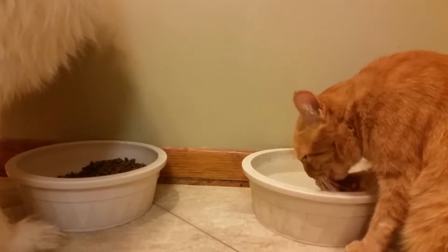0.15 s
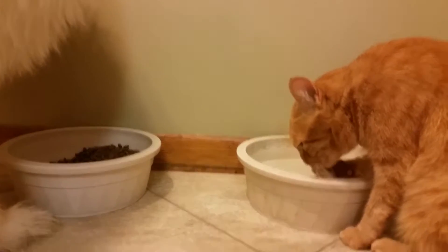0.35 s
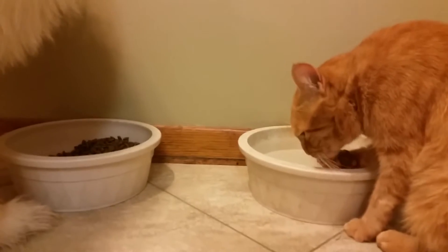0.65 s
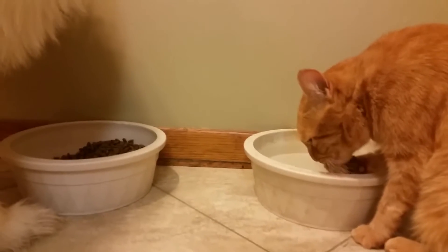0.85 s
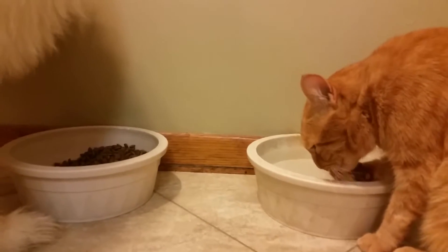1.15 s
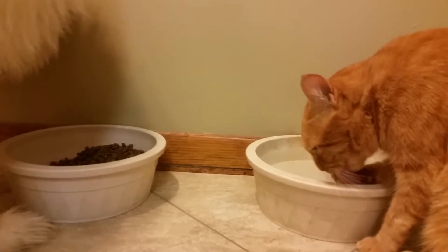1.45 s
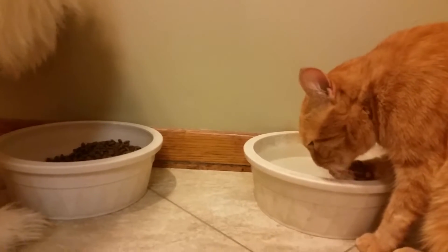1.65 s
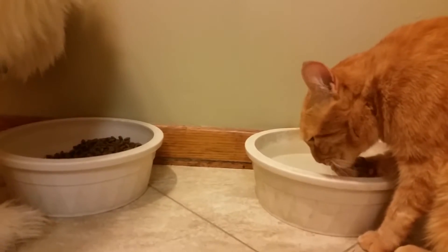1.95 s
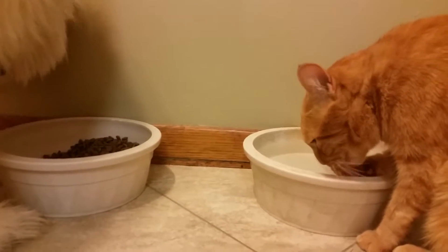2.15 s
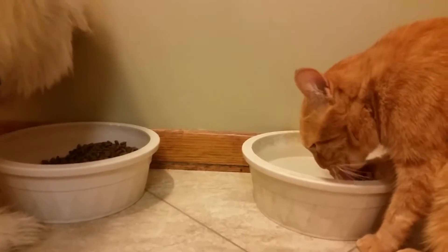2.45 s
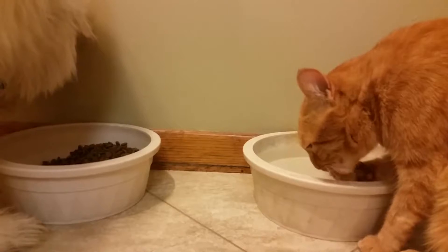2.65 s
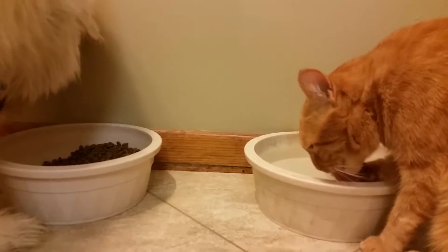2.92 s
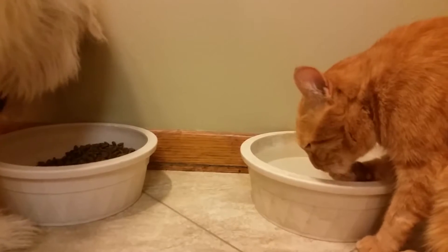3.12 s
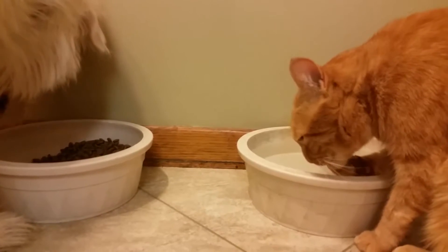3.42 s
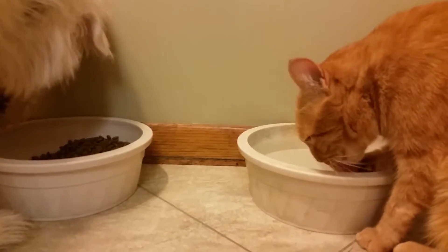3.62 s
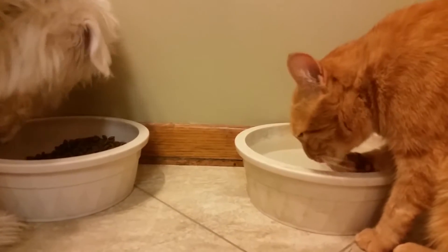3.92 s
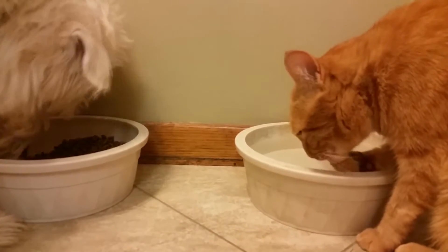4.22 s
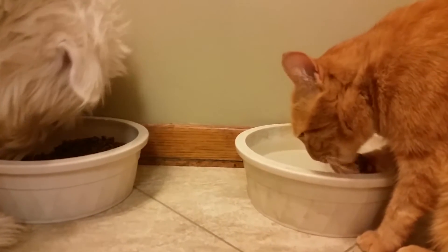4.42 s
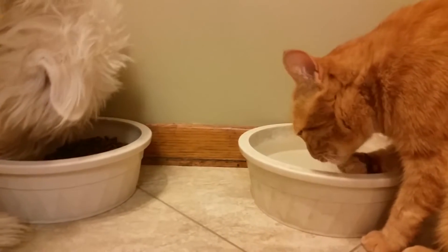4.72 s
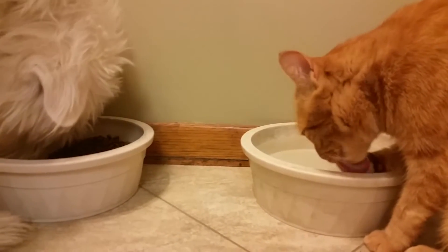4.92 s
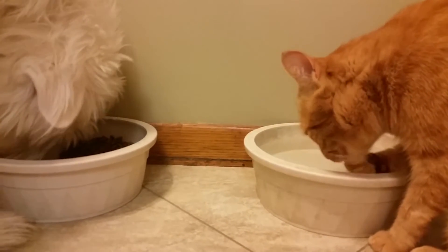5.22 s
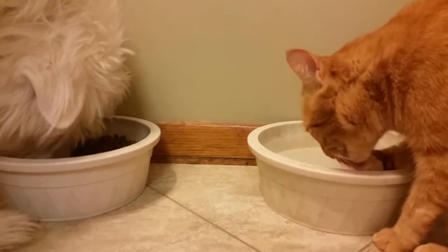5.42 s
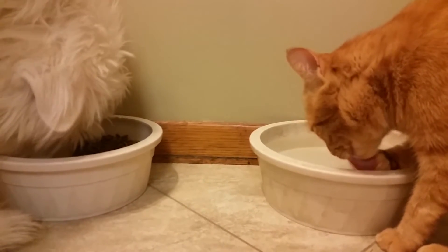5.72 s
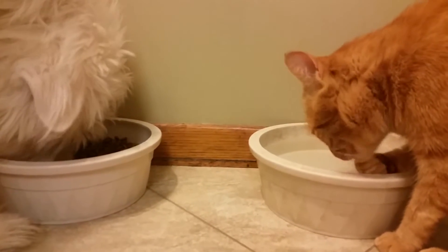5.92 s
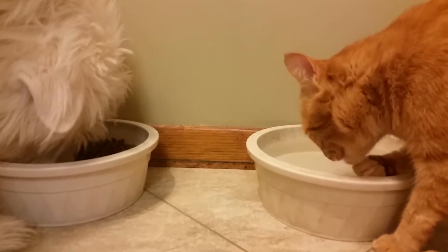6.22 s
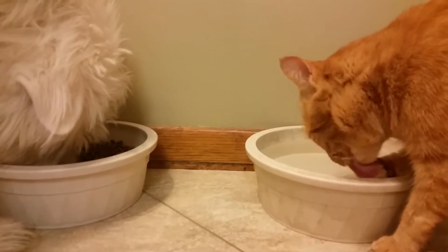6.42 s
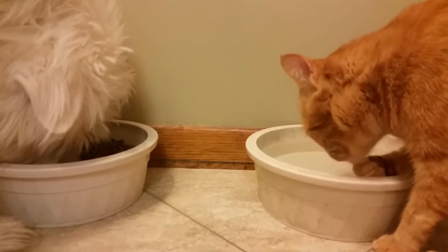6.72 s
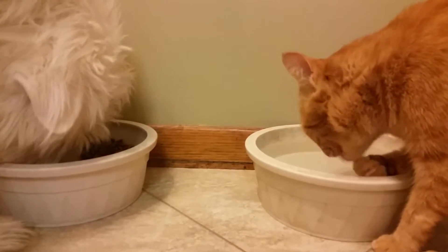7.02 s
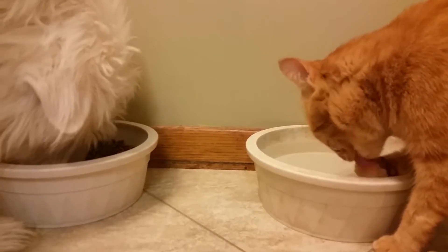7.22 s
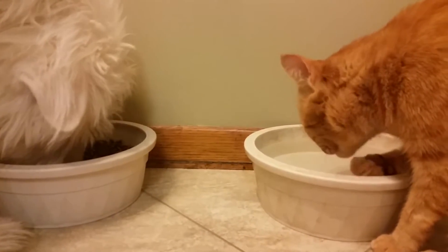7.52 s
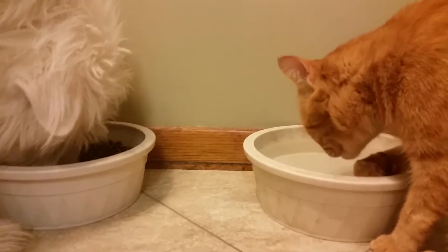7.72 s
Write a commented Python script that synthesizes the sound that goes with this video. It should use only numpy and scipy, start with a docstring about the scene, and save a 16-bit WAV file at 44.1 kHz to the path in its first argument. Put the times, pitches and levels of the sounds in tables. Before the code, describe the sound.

A low household hum and fan rush fill a small room; a few faint licks sound, then a dog starts cracking dry food.

```python
"""A dog cracks dry kibble over its bowl in a small tiled room: each pellet snaps, rings and sheds crumbs.
A cat laps water almost silently; tongues and lips make a few soft, wet smacks.
Underneath, household motors, probably a refrigerator, hum at nearly equal pitches and throb against
each other over a fan's rush. Fingers tick, rub and bump faintly on the hand-held camera, to the left."""
import sys
import numpy as np
from scipy import signal
from scipy.fft import rfft, irfft, next_fast_len
from scipy.io import wavfile
from scipy.ndimage import map_coordinates

SR = 44100
rng = np.random.default_rng(int(sys.argv[2]) if len(sys.argv) > 2 else 0)


def dump(signal):
    """Clip the signal to [-1, 1] and save it as 16-bit WAV at the path in sys.argv[1]."""
    limited = np.clip(np.atleast_2d(signal).T, -1, 1)
    pcm = np.round(limited * 32767).astype(np.int16)
    wavfile.write(sys.argv[1], SR, pcm)


N = 346625


def amp(db):
    """Decibels to gain."""
    return 10 ** (np.asarray(db) / 20)


def unit(x):
    """Scale to rms 1."""
    return x / np.sqrt(np.mean(x ** 2) + 1e-20)


def curve_at(points, hz):
    """Read a breakpoint curve on a log frequency axis."""
    freqs, values = np.transpose(points)
    return np.interp(np.log(hz + 1), np.log(freqs + 1), values)


def panned(db):
    """Stereo gains that put the left channel db above the right."""
    return amp(np.array([[db], [-db]]) / 2)


def wobble(rate):
    """Smooth random modulation, rate knots a second."""
    knots = rng.standard_normal(int(N * rate / SR) + 4)
    return map_coordinates(knots, [np.arange(N) * rate / SR])


def scattered(count):
    """Rising random places between 0 and 1, one in each equal part."""
    return (np.arange(count) + rng.random(count)) / count


def eq(x, gain):
    """Zero-phase EQ; gain is a function of frequency."""
    n = x.shape[-1]
    padded = next_fast_len(n + 8192)
    return irfft(rfft(x, padded) * gain(np.fft.rfftfreq(padded, 1 / SR)), padded)[..., :n]


def ringing_eq(x, colour_db):
    """Minimum-phase EQ: resonances ring after the hit, never before it."""
    n = len(x)
    cepstrum = irfft(np.log(amp(colour_db(np.fft.rfftfreq(n, 1 / SR)))), n)
    cepstrum[1:n // 2] *= 2
    cepstrum[n // 2 + 1:] = 0
    return irfft(rfft(x) * np.exp(rfft(cepstrum)), n)


def snap(rise_s, swarm, colour_db, size=2048):
    """One sharp slip in a brief cloud of tiny ones; swarm is their joint strength against it."""
    age = np.arange(size) / SR / rise_s
    slips = age * np.exp(-age) * rng.standard_normal(size)
    slips = swarm * slips / np.linalg.norm(slips)
    slips[np.argmin(np.abs(age - 1))] += 1
    return unit(ringing_eq(slips, colour_db)) * np.sqrt(SR / 1000 / size)  # energy of 1 ms at rms 1


# stereo image of the room tone: f/Hz, left-right correlation
ROOM_CORRELATION = [(60, 0.91), (130, 0.93), (290, 0.79), (640, 0.44), (1400, -0.29), (3000, 0.0068)]
def diffuse_noise(gain):
    """Room noise of rms 1: nearly mono in the bass, wide in the treble."""
    def mid_side_gain(hz):
        width = np.arccos(np.clip(curve_at(ROOM_CORRELATION, hz), -1, 1)) / 2
        return gain(hz) * np.array([np.cos(width), np.sin(width)])
    mid, side = eq(rng.standard_normal((2, N)), mid_side_gain)
    return unit(np.array([mid + side, mid - side]))


# dark rush of the fan: f/Hz, relative level/dB
FAN_EQ = [(25, -6), (45, -7.5), (90, 4.5), (200, 1.5), (400, -1), (520, -5), (760, -5.5), (1000, -13),
          (1450, -14.5), (2000, -24), (2900, -32.5), (4000, -27.5), (5500, -46.5), (9000, -53.5)]
# resonances of the humming cabinet: f/Hz, width/Hz, level/dB
CABINET_MODES = [(114.7, 8.9, -50.5), (137.6, 7.4, -57), (198.4, 18, -59), (276.2, 17.6, -58),
                 (398.4, 20.6, -59), (840, 52, -67.5), (1317, 62, -65.5)]
def fan():
    """Moving air lays a steady bed and stirs the cabinet's resonances."""
    air = amp(-48) * diffuse_noise(lambda hz: amp(curve_at(FAN_EQ, hz)))
    for centre, width, db in CABINET_MODES:
        air += amp(db) * diffuse_noise(lambda hz: 1 / (1 + ((hz - centre) / width * 1.52) ** 2))
    return air


# the loudest motor's pitch sags and recovers: t/s, f/Hz
MOTOR_GLIDE = [(0, 113.75), (2, 113.73), (2.6, 113.62), (4.3, 113.61), (5.2, 113.5), (6, 113.51),
               (7, 113.6), (7.8, 113.85)]
# two steady motor tones that beat against it: f/Hz
BEATING_HZ = [118.54, 120.01]
# the gliding tone, then the two steady ones: level/dB
BEATING_DB = [-41, -47, -47.5]
# weaker motor and fan tones: f/Hz, level/dB, pan left/dB
HUM_TONES = [(49.4, -66.5, 0.5), (58.5, -55.5, 3), (60, -70, 6.5), (78.86, -49, -2), (196.9, -60, -3),
             (226.7, -64, -10.5), (268.3, -58.5, -3.5), (296, -64, -1), (345.5, -61, 0.5),
             (361.7, -65, -0.5), (356, -73.5, -6), (394.4, -61.5, 3), (478, -75, -2), (598, -73, 4),
             (675, -77.5, -4.5), (836, -68.5, 12.5), (883, -78, 0.5), (1048, -77.5, 0.5), (1309, -73, 3.5),
             (1514, -84.5, 2.5), (2230, -90.5, 3.5)]
def motors(in_phase_s=3.127):
    """Three close tones throb, swelling together at in_phase_s; weaker tones waver around them."""
    t = np.arange(N) / SR
    glide = np.cumsum(np.interp(t, *np.transpose(MOTOR_GLIDE))) / SR
    cycles = [glide - np.interp(in_phase_s, t, glide)] + [hz * (t - in_phase_s) for hz in BEATING_HZ]
    throb = sum(amp(db) * np.cos(2 * np.pi * c) for c, db in zip(cycles, BEATING_DB))
    tones = throb * panned(-1.4)
    for hz, db, pan_db in HUM_TONES:
        drift = .0013 * hz * wobble(4)  # higher orders feel a change of speed more
        tones += amp(db) * panned(pan_db) * np.cos(2 * np.pi * (hz * t + rng.random()) + drift)
    return np.sqrt(2) * tones


# tone of the camera's case: f/Hz, relative level/dB
CASE_EQ = [(1500, -16), (2500, -1), (4000, -1.5), (6000, -13), (7800, -2), (9300, -8), (12000, -7.5),
           (15000, -20)]
# finger slides, each at its crest: t/s, level/dB
FINGER_RUBS = [(0.01, -74.5), (.27, -77.5), (.49, -79), (.8, -80), (1.25, -71), (1.335, -65), (1.6, -77),
               (4.09, -77.5), (5.18, -80), (5.56, -72)]
def finger_rubs(rise_s=.03, fall_s=.093):
    """Skin sticks and slips on the case: grainy rubs that swell quickly and die away."""
    t = np.arange(N) / SR
    swells = [amp(db) * np.exp(-np.maximum((s - t) / rise_s, (t - s) / fall_s)) for s, db in FINGER_RUBS]
    grain = unit(amp(4.5 * wobble(250)) * rng.standard_normal((2, N)))
    return np.max(swells, axis=0) * unit(eq(grain, lambda hz: amp(curve_at(CASE_EQ, hz))))


# finger ticks on the camera: t/s, level/dB, centre f/Hz
FINGER_TICKS = [(0.07, -55, 7530), (0.7821, -59, 7930), (0.85, -53.5, 12200), (0.8774, -56, 14900),
                (1.2296, -56, 8300), (1.3374, -48, 11400), (1.3613, -50.5, 7780), (1.5908, -52, 8000),
                (1.6352, -59, 6340), (3.998, -58, 15100), (4.0597, -58, 7750), (4.554, -54, 7460),
                (5.5393, -59, 7920), (7.1172, -53, 14700)]
def finger_ticks(faint_db=-62, faint_hz=8500):
    """Fingertips tick thinly on the case; the restless grip scatters fainter ticks between them."""
    track = np.zeros((2, N))
    faint = [(s, rng.normal(faint_db, 2.5), faint_hz * rng.lognormal(0, .3))
             for s in N / SR * scattered(count=24)]
    for s, db, centre in list(FINGER_TICKS) + faint:
        colour = lambda hz: curve_at(CASE_EQ, hz) - 18 * np.abs(np.log2((hz + 100) / centre))
        left, right = snap(.00071, 1.4, colour), snap(.00072, 2, colour)
        add(track, s, amp(db - 8) * np.array([left, right]))
    return track


def add(track, s, sound):
    """Mix a stereo sound into the track at time s."""
    part = track[:, max(round(s * SR), 0):][:, :sound.shape[1]]
    part += sound[:, :part.shape[1]]


# handling bumps: t/s, level/dB, f/Hz
GRIP_BUMPS = [(.27, -42, 60), (.33, -40, 60), (.5, -41, 58), (0.644, -41, 62), (0.811, -40, 250),
              (1.129, -45, 330), (2.255, -47, 60), (7.25, -48, 52)]
def grip_bumps():
    """The hand shifts its grip: dull bumps that die within a few cycles."""
    track, t = np.zeros((2, N)), np.arange(SR // 8) / SR
    for s, db, hz in GRIP_BUMPS:
        cycles = hz * t
        envelope = 2 * cycles * np.exp(-1.6 * cycles)
        add(track, s, amp(db + 6) * panned(4) * envelope * np.sin(2 * np.pi * cycles))
    return track


# decay of the tiled room: f/Hz, t60/s
ROOM_DECAY = [(300, 0.65), (1500, 0.64), (4000, 0.51), (11000, 0.48)]
def reverb(x, tail_db, early_db, early_t60):
    """Early reflections off bowl, floor and wall, then the room's tail; new for every sound."""
    hz, t, spectrum = signal.stft(rng.standard_normal((2, SR // 2)), SR, nperseg=256)
    decay = amp(-60 * t / curve_at(ROOM_DECAY, hz)[:, None])
    tail = signal.istft(spectrum * decay, SR, nperseg=256)[1]
    t = np.arange(tail.shape[1]) / SR
    tail *= 1 - np.exp(-t / .0018)
    sparse = rng.standard_normal(tail.shape) ** 3
    early = sparse * (1 - np.exp(-t / .002)) * amp(-60 * t / early_t60)
    response = amp(tail_db) * tail / np.linalg.norm(tail[0])
    response += amp(early_db) * early / np.linalg.norm(early[0])
    return signal.fftconvolve(x[None], response, axes=1)


# soft wet smacks of tongue and lips: t/s, level/dB, starting f/Hz
WET_SMACKS = [(1.125, -43, 1000), (1.283, -41, 1210), (5.582, -36.5, 1110), (5.596, -35.5, 830),
              (7.494, -39, 806)]
def wet_smacks():
    """A small wet cavity opens and rings for a few cycles, rising in pitch."""
    track, t = np.zeros((2, N)), np.arange(SR // 20) / SR
    envelope = np.exp(-t / .0012) * (1 - np.exp(-t / .001))
    for s, db, hz in WET_SMACKS:
        pop = amp(db + 5) * envelope * np.sin(2 * np.pi * hz * t * (1 + 3 * t))
        add(track, s, panned(5) * pop)
        add(track, s, reverb(pop, tail_db=4.5, early_db=-5, early_t60=.051))
    return track


# tone of breaking kibble: f/Hz, relative level/dB
KIBBLE_EQ = [(200, -13), (600, 4.5), (1000, 0.5), (1550, 4), (2200, -2.5), (3000, -9.5), (4000, -5.5),
             (5200, -13), (6600, -9), (8200, -6), (10500, -10), (12500, -19.5), (15000, -34.5)]
def pellet_colour(treble_db, crunch_db=6, ring_hz=2690, ring_db=6, half_width_hz=96):
    """One pellet's EQ curve in dB: kibble tilted by the mouth, with four sharp resonances of its own."""
    tilt = [(2000, 0), (4000, crunch_db + .21 * treble_db), (7500, treble_db)]
    pitches = ring_hz * rng.lognormal(0, .303, size=(4, 1))
    rings = lambda hz: np.max(ring_db / (1 + ((hz - pitches) / half_width_hz) ** 2), axis=0)
    return lambda hz: curve_at(KIBBLE_EQ, hz) + curve_at(tilt, hz) + rings(hz)


def from_left(x):
    """Place a sound slightly left: it reaches the right microphone softer and 6 samples later."""
    return panned(1.5) * np.array([x, np.roll(x, shift=6)])


# the dog's teeth snap a pellet: t/s, level/dB, treble/dB
KIBBLE_CRACKS = [(5.4564, -50, -21), (5.504, -45.5, -18), (5.64, -44, -5), (5.649, -33.5, -7),
                 (5.6763, -36, -5), (5.6894, -34.5, -2.5), (5.7037, -39.5, -4), (5.9349, -39.5, -9.5),
                 (5.9437, -37.5, -16), (6.108, -34.5, -4.5), (6.2305, -41, -11.5), (6.3104, -39, -18.5),
                 (6.4658, -44.5, -9), (6.5379, -31.5, -12), (6.718, -46, -12), (7.008, -35.5, -7.5),
                 (7.06, -46, -16), (7.3352, -49, -25), (7.618, -36, -13), (7.636, -31, 4.5),
                 (7.647, -39, -6), (7.668, -36.5, -4), (7.6979, -36, 2)]
def chewing(rise_s=.0008, send_db=-3, crumb_db=-11, crumb_span_s=.05, crumb_fade_db_per_s=160):
    """Pellets fracture between teeth: bright with open jaws, dull when the lips close over them."""
    track = np.zeros((2, N))
    for s, db, treble_db in KIBBLE_CRACKS:
        colour = pellet_colour(treble_db)
        add(track, s, amp(db) * from_left(snap(rise_s, swarm=3.8, colour_db=colour)))
        # the room hears the fracture from all sides, which evens out its colour
        send = snap(rise_s, swarm=0, colour_db=colour)
        add(track, s, amp(db + send_db) * reverb(send, tail_db=1, early_db=-3, early_t60=.049))
        # crumbs give way just after the main fracture, ever weaker
        for wait in crumb_span_s * scattered(count=5):
            gain = amp(db + crumb_db - crumb_fade_db_per_s * wait)
            crumb = gain * snap(.00057, swarm=2.8, colour_db=colour)
            add(track, s + .003 + wait, from_left(crumb))
    return track


def scene():
    """The mix: motor and fan bed, the animals, and handling noise near the left microphone."""
    bed = motors() + fan()
    animals = chewing() + wet_smacks()
    handling = finger_rubs() + finger_ticks() + grip_bumps()
    return bed + animals + handling * panned(6.4)


# colouring of the microphone ports: f/Hz, pan left/dB
PORT_BALANCE = [(500, 0.5), (1300, 2), (2400, -2), (4000, 3.5), (5400, -9), (6800, -9), (8000, 14.5),
                (9500, 4), (11500, 12.5), (15000, -1.5)]
# microphone hiss: f/Hz, relative level/dB
HISS_EQ = [(2000, -23), (6000, -13), (9500, -12), (11500, -5), (13500, -5), (15500, 1)]
TOP_HZ = 15830
def record(dry):
    """Each port colours the treble its own way; the electronics hiss; nothing passes above TOP_HZ."""
    heard = eq(dry, lambda hz: amp(np.array([[.5], [-.5]]) * curve_at(PORT_BALANCE, hz)))
    noise = eq(rng.standard_normal((2, N)), lambda hz: amp(curve_at(HISS_EQ, hz)) * (hz < TOP_HZ))
    hiss = amp(-74.5) * unit(noise) * panned(1.2)
    return eq(heard + hiss, lambda hz: hz < TOP_HZ)


dry = scene()
out = record(dry)
dump(out)
```